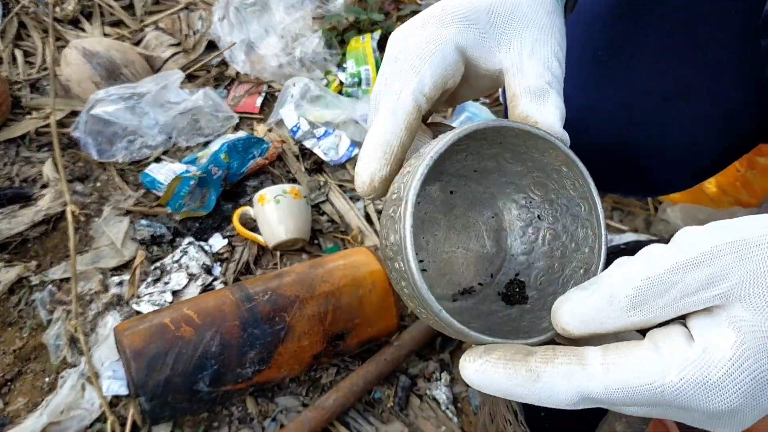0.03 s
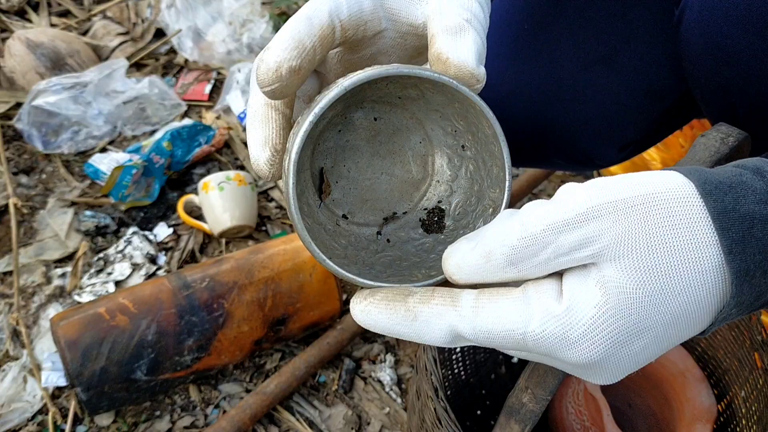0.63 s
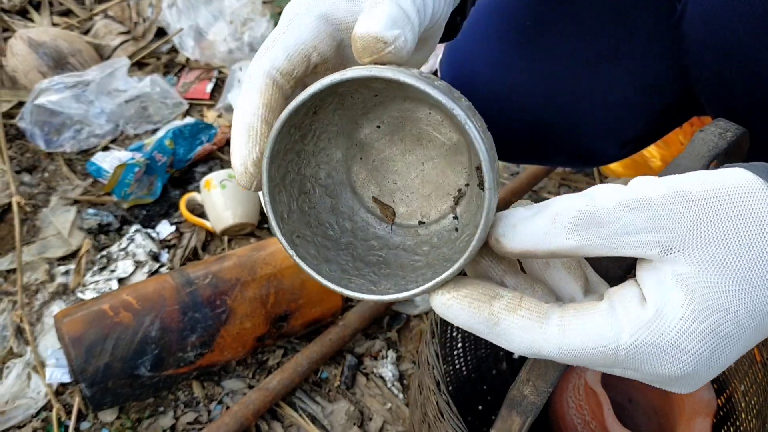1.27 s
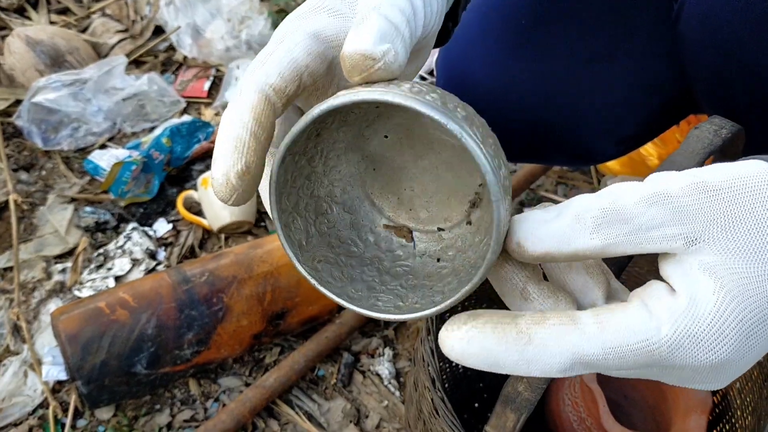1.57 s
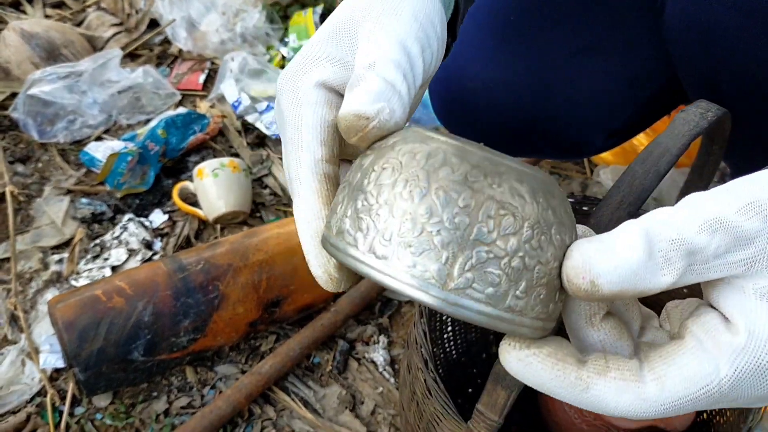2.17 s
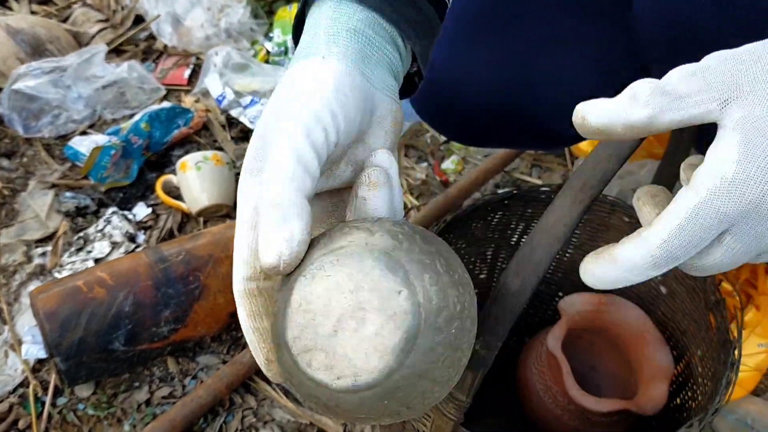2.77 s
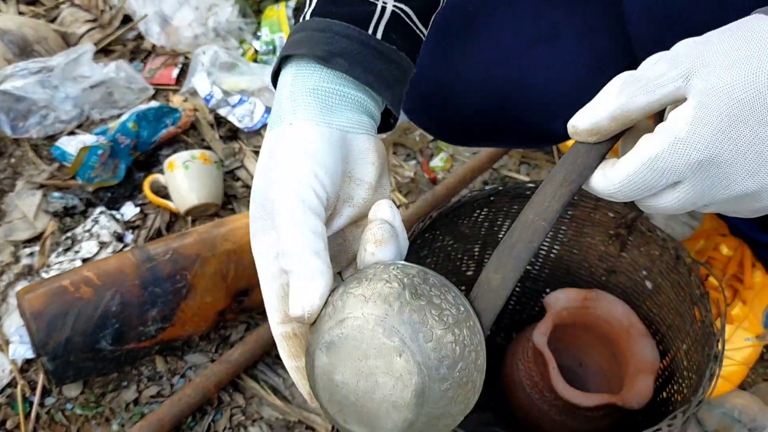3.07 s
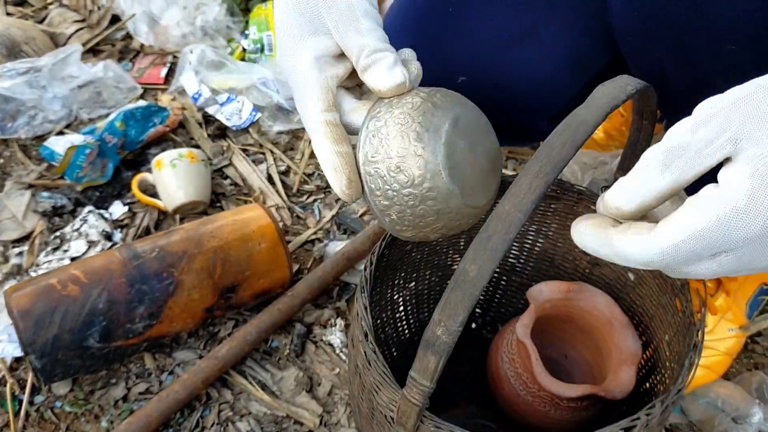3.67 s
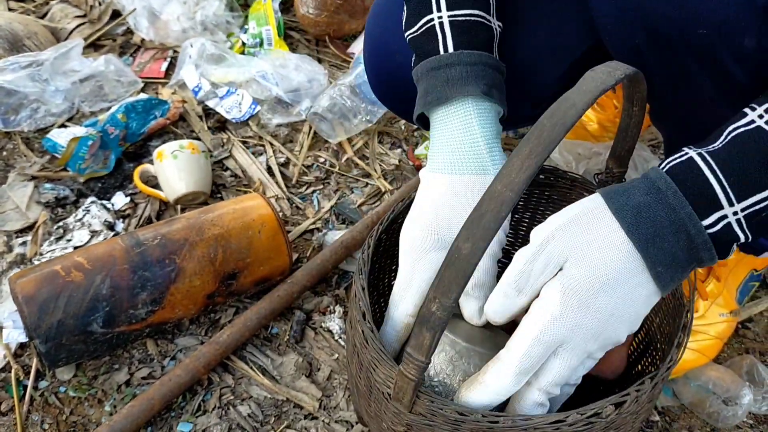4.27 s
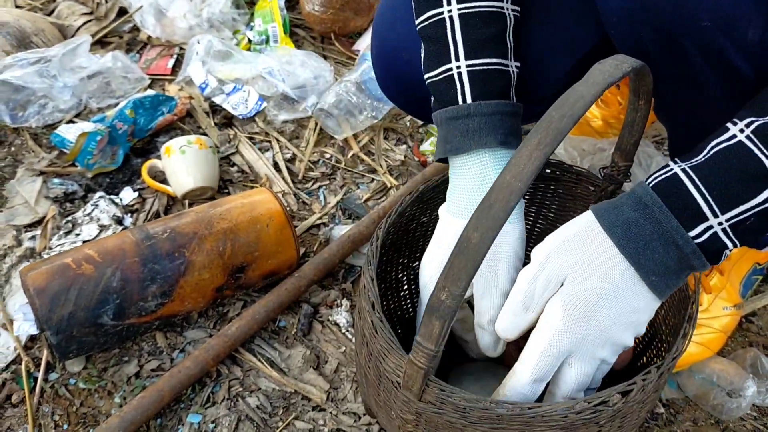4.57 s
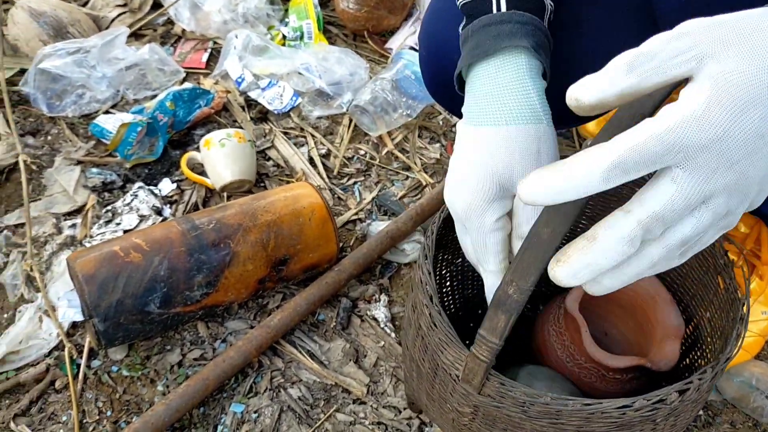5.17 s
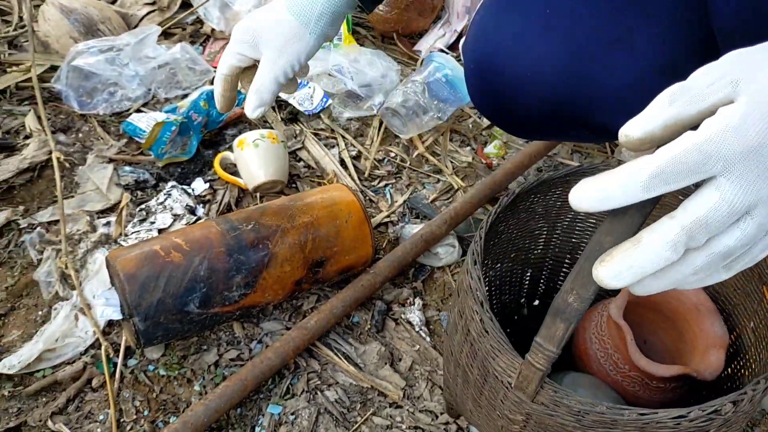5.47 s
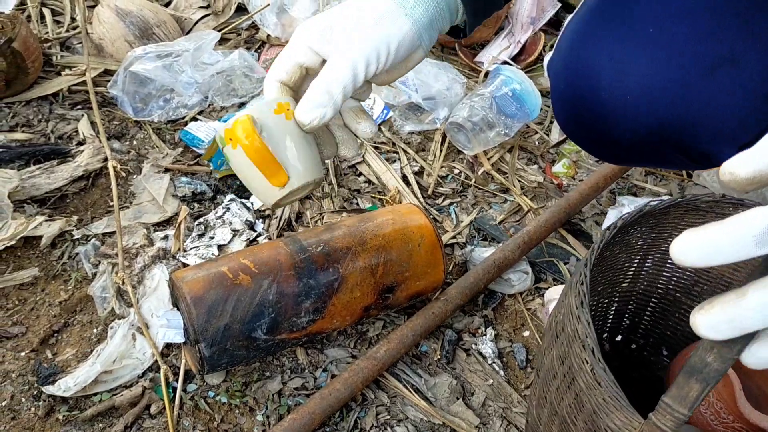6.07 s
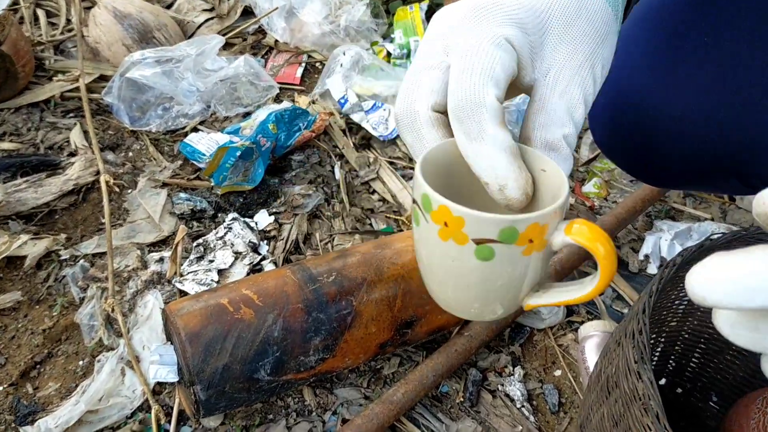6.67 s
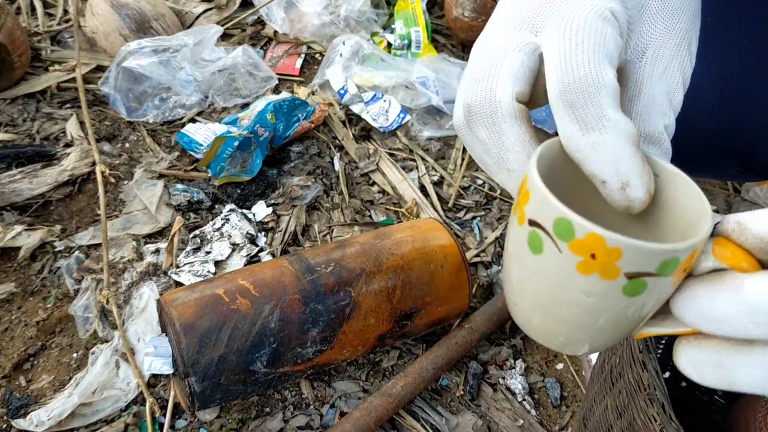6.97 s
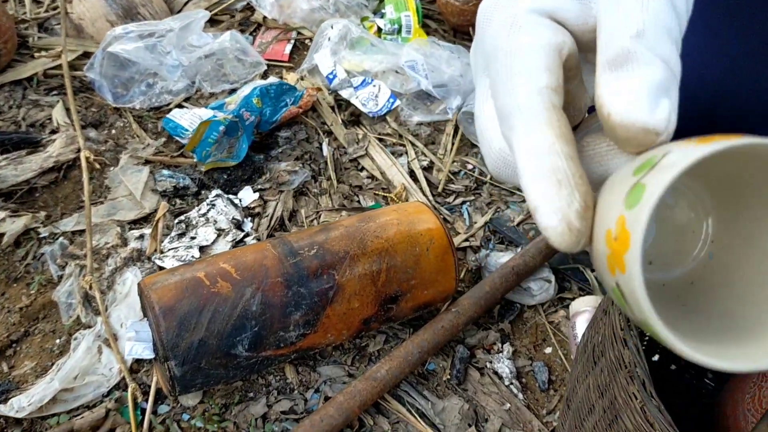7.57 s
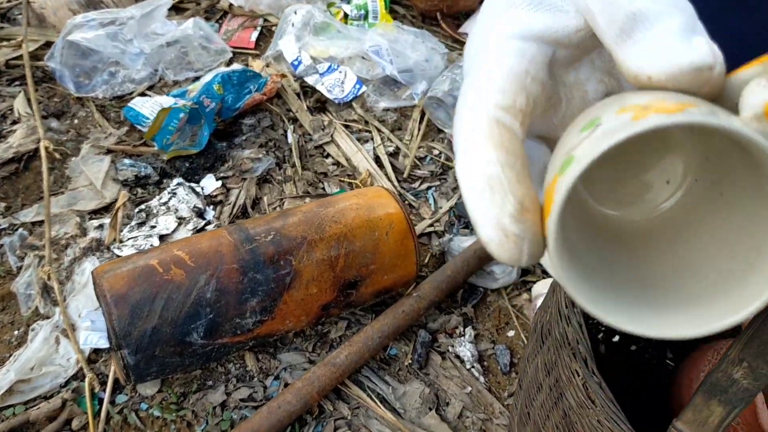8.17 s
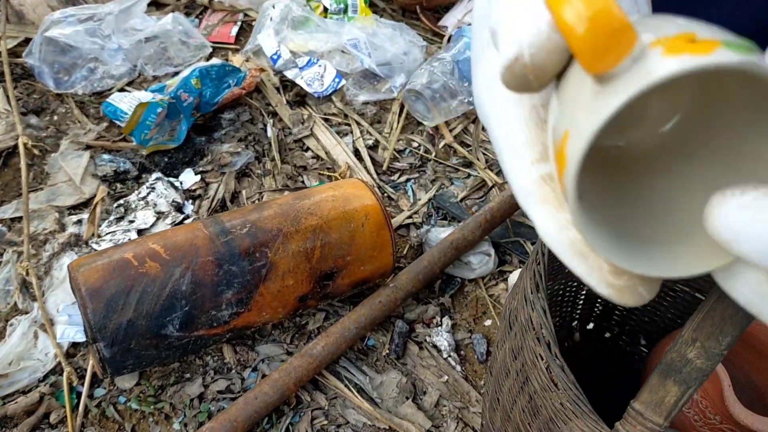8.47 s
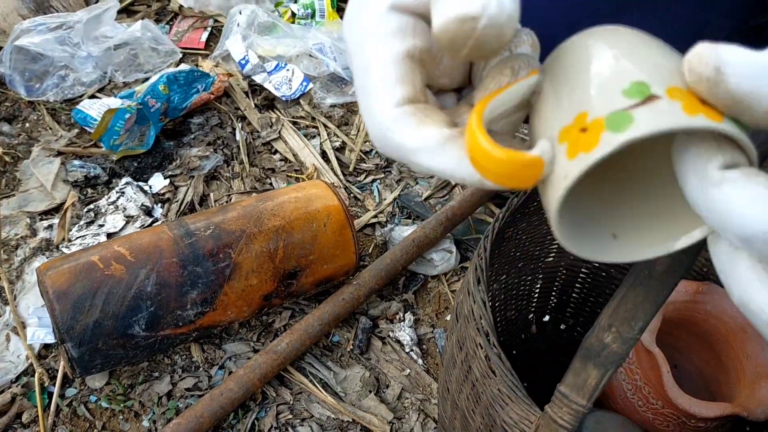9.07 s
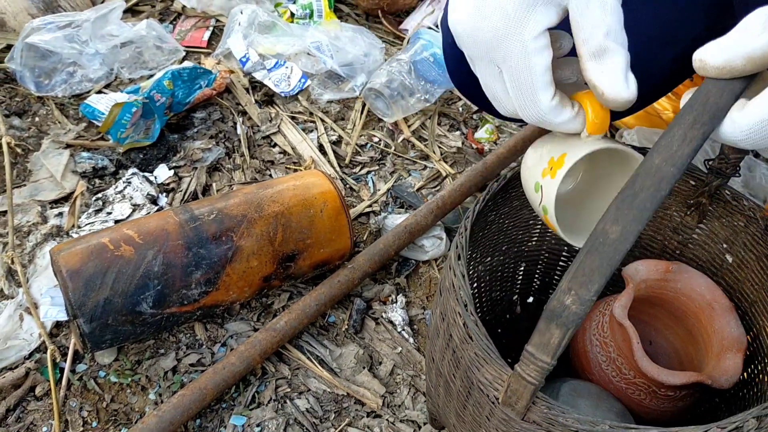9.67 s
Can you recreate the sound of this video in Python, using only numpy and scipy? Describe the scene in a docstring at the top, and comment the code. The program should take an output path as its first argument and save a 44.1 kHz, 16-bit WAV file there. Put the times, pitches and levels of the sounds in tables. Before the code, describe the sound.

A quiet, slightly wavering low hum and rumble continue throughout, outdoors, with light hiss and very faint distant crickets. From the start, cloth gloves rub softly on a small metal bowl close by, with scattered ticks of grit and faint squeaks; a stronger scuff comes near 2.7 seconds. At about 3.0, 3.15 and 3.3 seconds the bowl knocks on a wooden pole: three sharp, short, damped metallic knocks, the third lighter. Soft rubbing continues. At about 4.6 seconds the bowl clinks brightly against a clay pot, thuds on a basket floor and chatters to rest almost at once. These knocks and the landing are by far the loudest sounds, with almost no echo. Near 5.9 seconds dry litter scuffs lightly as a china mug is lifted. Gloves then rub faintly on the mug until the end near 9.8 seconds, with a few small rasping strokes between 7.5 and 8.3 seconds.

```python
"""Gloves rub on a small, gritty metal bowl as they turn it; outdoors, low hum, faint crickets.
Three knocks on a wooden pole shake out dirt: damped modes of bowl and pole, plus a short crack.
Lowered into a basket, the bowl clinks on a clay pot, thuds on the basket floor and chatters to rest.
Then a china mug is lifted from dry litter and turned in the gloves, which rub softly on it.
Rubbing is a run of tiny slips: it hisses and drives the modes of bowl and mug."""
import sys
import numpy as np
from scipy import signal
from scipy.fft import rfft, irfft, next_fast_len
from scipy.io import wavfile
from scipy.ndimage import uniform_filter1d, minimum_filter1d

SR = 44100
rng = np.random.default_rng(int(sys.argv[2]) if len(sys.argv) > 2 else 0)


def to_wav(s):
    """Save 16-bit WAV."""
    ch = np.atleast_2d(s).T  # columns
    pcm = np.round(np.clip(ch, -1, 1) * 32767)  # PCM
    wavfile.write(sys.argv[1], SR, pcm.astype(np.int16))


N = 432621
TIME_S = np.arange(N) / SR
EVENT_S = np.arange(SR // 3) / SR  # time axis of one event
EVENT_MID_S = EVENT_S.mean()

# wandering hum: t/s, f/Hz, level/dB
HUM_CURVE = [(0.0, 203, -68.5), (0.38, 202.5, -71), (0.85, 208.9, -70), (2.15, 207.1, -75.5),
             (2.9, 212.5, -69), (3.4, 208, -71.5), (3.9, 208.2, -71), (4.45, 200.6, -69.5),
             (4.8, 201.7, -68), (5.25, 205.8, -73), (6.1, 210.3, -73), (7.6, 207.1, -66.5),
             (9.05, 210.6, -69.5), (9.6, 209.8, -65.5), (9.81, 203.4, -72)]
# faint steady hum lines: f/Hz, level/dB
HUM_LINES = [(56, -74), (112, -73)]
# rumble envelope: t/s, level/dB
RUMBLE_CURVE = [(0.0, -58), (1.0, -58.5), (1.7, -62), (3.1, -58.5), (4.9, -58.5), (6.25, -63), (7.9, -57.5),
                (8.9, -60.5), (9.81, -58)]
# rumble spectrum: f/Hz, rel. level/dB
RUMBLE_SPECTRUM = [(15, -19.5), (25, -4.5), (36, -2.5), (56, 1.5), (90, -2), (125, -1), (160, -8),
                   (195, -12.5), (235, -18), (330, -28), (600, -45.5), (3000, -90.5)]
# open-air spectrum: f/Hz, rel. level/dB
AIR_SPECTRUM = [(180, -31), (300, 0.5), (378, -7), (417, -1.5), (535, -5.5), (652, -6), (1140, -7.5),
                (1280, -9), (1460, -8), (2650, -10), (5850, -26.5), (8010, -17), (10800, -24.5),
                (15500, -13.5)]
# far crickets: start/s, end/s, f/Hz, chirp period/s, level/dB
FAR_CRICKETS = [(.1, 9.81, 7900, .204, -89), (.1, 9.81, 7660, .204, -93), (.4, 1.5, 8280, .153, -87),
                (.02, .35, 9330, .33, -85)]
# scatter off ground and plants: f/Hz, rel. level/dB
SCATTER_SPECTRUM = [(200, -2.0), (700, -4.0), (1300, -9.0), (3000, -6.5), (15000, -8.5)]

# metal bowl: f/Hz, free t60/s, rim-struck level/dB, wall-struck level/dB
BOWL_MODES = [(983, 0.12, -30.5, -13.5), (1166, .06, -2, -19.5), (2070, .035, -18, -14.5),
              (2325, .06, -16.5, -17), (2570, .06, -18, -14.5), (2990, 0.039, -4, -7.5),
              (3150, 0.037, -12, -26.5), (3440, 0.092, -20.5, -20.5), (3880, 0.098, -16, -19),
              (4190, .085, -5, -5.5), (4630, 0.015, -21.5, -4.5), (5278, .055, -25.5, -10),
              (5500, 0.044, -25.5, -11.5), (5860, 0.09, -16.5, -11), (5970, 0.065, -19, -10),
              (6160, .05, -18.5, -11.5), (7955, .045, -22, -17), (8640, .055, -13.5, -9.5),
              (8800, 0.05, -23, -28), (13000, 0.065, -17.5, -23.5), (13780, 0.063, -13.5, -20.5),
              (14150, 0.051, -13.5, -16), (14630, .06, -13.5, -23.5), (14600, .06, -14.5, -33),
              (15700, .035, -9.5, -18), (15400, 0.05, -25.5, -17.5)]
# wooden pole: f/Hz, t60/s, rel. level/dB
POLE_MODES = [(750, 0.027, -18), (953, 0.017, -2), (1450, 0.015, 2), (1586, 0.015, -9.5),
              (2630, 0.0057, -11)]
# pot ring with dull basket thud: f/Hz, t60/s, rel. level/dB
POT_BASKET_MODES = [(577.3, .02, -23), (736, 0.059, -17), (840, 0.024, -1), (998, .06, -5.5),
                    (1106, 0.066, -10.5), (1458, 0.018, -7), (1650, .04, -11), (1783, .07, -16),
                    (1976, 0.16, -8), (2444, .05, -11.5), (2810, 0.0054, -3), (2805, .05, -6),
                    (3016, 0.2, -26.5), (3800, .12, -18.5), (4830, 0.075, -25.5)]
# held china mug: f/Hz, t60/s, rel. level/dB
MUG_MODES = [(1688, 0.0019, 0), (2552, 0.0096, -4), (3130, 0.012, -8.5), (3830, 0.006, -5),
             (4770, 0.013, -11.5), (5400, 0.013, -15.5), (6600, 0.0048, -8.5), (8000, 0.007, -6),
             (8970, 0.009, -10)]

# glove sliding on the mug: t/s, rel. level/dB
MUG_EFFORT = [(5.1, -79.5), (5.6, -85), (6.35, -84.5), (6.85, -81.5), (8.2, -77.5), (8.6, -88.5),
              (9.15, -83), (9.33, -76), (9.81, -85)]
# cloth on glaze: f/Hz, rel. level/dB
MUG_RUB_SPECTRUM = [(300, -6), (1000, 6.5), (2500, 4.5), (4500, -4.5), (8000, -6), (11000, -4.5),
                    (13000, -1.5), (15200, 4)]
# finger strokes on the mug: mid t/s, half-length/s, level/dB
MUG_STROKES = [(7.504, 0.027, -75.5), (7.95, 0.007, -65.5), (8.017, 0.028, -68.5), (8.119, .026, -67),
               (8.215, 0.018, -68.5), (8.325, 0.012, -71)]
# glove sliding on the bowl: t/s, rel. level/dB
BOWL_EFFORT = [(0.0, -70), (0.45, -82.5), (0.92, -73), (1.6, -81.5), (1.85, -73.5), (2.2, -83.5),
               (2.62, -68), (2.9, -71.5), (3.45, -65), (4.05, -74), (4.28, -68), (5.1, -76)]
# cloth on metal: f/Hz, rel. level/dB
BOWL_RUB_SPECTRUM = [(300, -17.5), (900, 5), (3000, 1.5), (6500, -10), (8800, -2.5), (11000, -6.5),
                     (13000, 1.5), (15200, 3)]
# finger drags on the bowl: mid t/s, half-length/s, f/Hz, level/dB
BOWL_SQUEALS = [(.75, 0.011, 4220, -80), (2.62, 0.1, 3138, -77), (2.66, 0.12, 5894, -77),
                (3.09, 0.055, 4230, -74), (3.66, .1, 4280, -85), (4.25, 0.038, 3050, -75.5)]
# glove, dirt and litter slips, and one soft bump of the bowl on the pole (3.379 s):
# mid t/s, half-length/s, level/dB, f/Hz, width/oct, sparkle level/dB
SCUFFS_AND_BUMP = [(1.797, .028, -72.5, 3600, 0.49, -71), (2.262, .022, -83, 3200, .6, -65),
                   (2.712, 0.047, -60.5, 2980, 1.7, -57), (3.379, 0.0045, -50.5, 1100, 0.35, -80),
                   (3.809, .022, -75, 5000, 1.2, -69), (3.962, .012, -60.5, 7050, 1.5, -67),
                   (4.798, 0.016, -63, 1490, 1.1, -68), (5.247, 0.013, -70, 2400, 0.99, -78),
                   (5.867, 0.0053, -63, 3000, 1.7, -59), (6.495, 0.0092, -74.5, 3200, 1, -88),
                   (9.032, .011, -67, 3800, 1.5, -89), (9.125, 0.015, -67, 4300, 1.9, -93)]
# clearest grit snaps: t/s, level/dB, centre f/Hz, rel. sparkle level/dB
GRIT_SNAPS = [(0.0702, -61.5, 4000, -58), (0.5375, -67, 8800, -65), (0.9226, -59, 8400, -61),
              (2.1475, -61, 9980, -68), (2.2615, -55, 3460, -68), (2.3002, -68, 3170, -66),
              (2.3436, -61, 8780, -61), (2.356, -59, 8580, -56), (3.2835, -55, 4140, -62),
              (3.5315, -60, 4020, -65), (6.596, -68, 3320, -69), (6.7175, -62, 3230, -74)]

# bowl clinks on the pot and thuds on the basket floor (4.6897 s):
# t/s, bowl level/dB, pot and basket level/dB, crack level/dB, crack t60/s, contact cutoff/Hz
LANDING_HITS = [(4.6288, -16, -31.5, -13, .04, 14900), (4.6824, -45, -35.5, -25, .03, 14000),
                (4.6897, -36, -20, -16.5, .022, 3500), (4.6946, -43, -42, -20, .04, 4020),
                (4.7020, -39, -26, -34, .04, 3030), (4.7095, -45, -31, -28, .04, 2520),
                (4.716, -39.5, -28.5, -38, .04, 3000)]
# crack of the landing bowl: f/Hz, rel. level/dB
LANDING_SPECTRUM = [(150, -9), (300, -8.5), (700, 10), (1500, 1.5), (3000, 2.5), (6000, -18.5), (7000, -7),
                    (8600, 0.5), (11000, -11), (15000, 4)]
# bowl on pole: t/s, bowl level/dB, pole level/dB, crack level/dB, contact cutoff/Hz
POLE_HITS = [(2.9851, -10, -9.5, -8.5, 14540), (3.1441, -11.5, -11.5, -13, 14500),
             (3.3097, -17.5, -17, -21.5, 14000)]
# crack of bowl on pole: f/Hz, rel. level/dB
KNOCK_SPECTRUM = [(120, -15), (350, 3), (600, -1), (1250, 7), (1900, -7), (2500, -2), (4000, -1.5),
                  (7000, -8.5), (8600, 0.5), (11000, -10.5), (15000, 6)]

BOWL_END_S, MUG_START_S = BOWL_EFFORT[-1][0], MUG_EFFORT[0][0]


def from_db(db):
    """Decibels to gain."""
    return 10 ** (np.asarray(db) / 20)


def unit_rms(x):
    """Scale to rms 1."""
    return x / np.sqrt(np.mean(x ** 2) + 1e-20)


def curves(rows):
    """Each value column, interpolated to every sample."""
    t_s, *columns = np.transpose(rows)
    return [np.interp(TIME_S, t_s, column) for column in columns]


def add(out, t_s, sound):
    """Mix a sound in from t_s."""
    start = max(0, int(round(t_s * SR)))
    out[start:start + len(sound)] += sound[:N - start]


def coloured(x, spectrum):
    """Shape noise by a spectrum; rms 1."""
    hz, db = np.transpose(spectrum)
    size = next_fast_len(len(x))
    bins_hz = np.maximum(np.fft.rfftfreq(size, 1 / SR), 1)
    gain = from_db(np.interp(np.log(bins_hz), np.log(hz), db))
    return unit_rms(irfft(rfft(x, size) * gain, size)[:len(x)])


def hump(hz, width_oct):
    """Bell-shaped spectrum, -3 dB at width_oct either side."""
    return [(hz * 2 ** (k * width_oct), -3 * k * k) for k in range(-4, 5)]


def swell(half_s):
    """Gaussian envelope, centred on EVENT_MID_S."""
    return np.exp(-.5 * ((EVENT_S - EVENT_MID_S) / half_s) ** 2)


def drift(rate_hz):
    """Random wander between unit-normal knots."""
    knots = rng.standard_normal(N // 50)
    return np.interp(TIME_S * rate_hz, np.arange(len(knots)), knots)


def tone(hz):
    """Sine following a pitch curve; rms 1."""
    return unit_rms(np.sin(2 * np.pi * np.cumsum(hz) / SR))


def grains(size, spread_db):
    """Friction: dense tiny slips of unequal strength."""
    return rng.standard_normal(size) * from_db(spread_db * rng.standard_normal(size))


def resonate(force, hz, t60_s):
    """One driven mode; a unit click rings at height 1."""
    radius, angle = from_db(-60 / (t60_s * SR)), 2 * np.pi * hz / SR
    return signal.lfilter([0, np.sin(angle)], [1, -2 * radius * np.cos(angle), radius ** 2], force)


def ring(modes, scatter_db):
    """Struck modes: decaying sines of alternating sign, levels scattered per blow."""
    hz, t60_s, db = np.transpose(modes)[:, :, None]
    sign = (-1) ** np.arange(len(db))[:, None]
    gain = sign * from_db(db + scatter_db * rng.standard_normal(db.shape))
    return np.sum(gain * np.sin(2 * np.pi * hz * EVENT_S) * from_db(-60 * EVENT_S / t60_s), axis=0)


def crack(spectrum, t60_s):
    """Crowded short-lived modes as a dying noise burst."""
    return coloured(rng.standard_normal(len(EVENT_S)), spectrum) * from_db(-60 * EVENT_S / t60_s)


def contact(x, cutoff_hz):
    """Softer contact, less treble."""
    return signal.sosfilt(signal.butter(1, cutoff_hz, fs=SR, output="sos"), x)


def gripped(t60_s, hand_t60_s=.038):
    """Decay time with the hand's losses added to the metal's."""
    return 1 / (1 / t60_s + 1 / hand_t60_s)


def background(air_db):
    """Wandering hum, faint lines, low rumble and open-air hiss."""
    hum_hz, hum_db = curves(HUM_CURVE)
    hum = from_db(hum_db) * tone(hum_hz)
    for line_hz, db in HUM_LINES:
        wavering_hz = line_hz * (1 + .006 * drift(40))
        hum += from_db(db + 2.5 * drift(1.7)) * tone(wavering_hz)
    rumble_db, = curves(RUMBLE_CURVE)
    rumble = from_db(rumble_db) * coloured(rng.standard_normal(N), RUMBLE_SPECTRUM)
    air = from_db(air_db) * coloured(rng.standard_normal(N), AIR_SPECTRUM)
    return hum + rumble + air


def crickets(jitter_beats, flicker_db):
    """Thin repeated chirps, unsteady in pace, pitch and level."""
    out = np.zeros(N)
    for start_s, end_s, hz, period_s, db in FAR_CRICKETS:
        beat = (TIME_S - start_s) / period_s + jitter_beats * drift(4)
        chirps = np.sin(np.pi * beat) ** 4 * (TIME_S > start_s) * (TIME_S < end_s)
        pitch_hz = hz * (1 + .007 * drift(400))
        out += from_db(db + flicker_db * drift(9.5)) * chirps * tone(pitch_hz)
    return out


def surroundings(x, wet_db):
    """Direct sound plus a brief tail scattered by ground and plants."""
    tail = crack(SCATTER_SPECTRUM, t60_s=.17)
    return x + from_db(wet_db) * signal.fftconvolve(x, tail / np.linalg.norm(tail))[:N]


def mug_rub(hiss_gain_db):
    """Cloth hisses over glaze; firmer strokes rasp into the mug's modes."""
    effort_db, = curves(MUG_EFFORT)
    hiss = coloured(grains(N, spread_db=5), MUG_RUB_SPECTRUM) * from_db(1.5 * drift(20))
    out = from_db(effort_db + hiss_gain_db) * hiss * (TIME_S > MUG_START_S)
    for t_s, half_s, db in MUG_STROKES:
        force = grains(len(EVENT_S), spread_db=6)
        rasp = sum((-1) ** k * from_db(mode_db) * resonate(force, hz, t60_s)
                   for k, (hz, t60_s, mode_db) in enumerate(MUG_MODES))
        add(out, t_s - EVENT_MID_S, from_db(db) * swell(half_s) * unit_rms(rasp))
    return out


def bowl_rub(hiss_gain_db, sing_db, sing_slope, wall_share, slip_delay_s, slip_gain_db):
    """Knit hisses over embossed metal; firm sliding and a slip after each knock make the modes sing."""
    effort_db, = curves(BOWL_EFFORT)
    catching = from_db(2 * drift(25) + 1.8 * drift(250))
    hiss = coloured(grains(N, spread_db=6.5), BOWL_RUB_SPECTRUM) * catching
    hiss *= from_db(effort_db + hiss_gain_db)
    drag = from_db(sing_db + sing_slope * (effort_db - effort_db.max()) + 3.1 * drift(14))
    for t_s, bowl_db, *_ in POLE_HITS:
        slip = from_db(bowl_db + slip_gain_db) * swell(half_s=.025)
        add(drag, t_s + slip_delay_s - EVENT_MID_S, slip)
    force = grains(N, spread_db=2.5)
    singing = np.zeros(N)
    for hz, t60_s, rim_db, wall_db in BOWL_MODES:
        if 2800 < hz < 10000:
            mode_db = rim_db + wall_share * (wall_db - rim_db) + 4.5 * drift(20)
            singing += from_db(mode_db) * np.sqrt(hz) * resonate(force, hz, gripped(t60_s))
    return (hiss + drag * unit_rms(singing)) * (TIME_S < BOWL_END_S)


def squeals(t60_s, flutter_db):
    """Fingertip stick-slip feeds a single bowl mode; the level flutters."""
    out = np.zeros(N)
    for t_s, half_s, hz, db in BOWL_SQUEALS:
        mode = unit_rms(resonate(grains(len(EVENT_S), spread_db=2), hz, t60_s))
        add(out, t_s - EVENT_MID_S, from_db(db) * swell(half_s) * mode)
    return out * from_db(flutter_db * drift(35))


def scuffs_and_bump(sparkle_hz, sparkle_oct):
    """Glove, dirt and litter slips, one soft bump of bowl on pole: grainy swells, sparkle on top."""
    out = np.zeros(N)
    for t_s, half_s, db, hz, width_oct, sparkle_db in SCUFFS_AND_BUMP:
        noise = grains(len(EVENT_S), spread_db=4.5)
        body = from_db(db) * coloured(noise, hump(hz, width_oct))
        sparkle = from_db(sparkle_db) * coloured(noise, hump(sparkle_hz, sparkle_oct))
        add(out, t_s - EVENT_MID_S, swell(half_s) * (body + sparkle))
    return out


def grit(t60_s, sparkle_gain_db, faint_per_s, faint_db, faint_hz):
    """Grains snap and die at once; fainter ones come at random while the bowl is handled."""
    out = np.zeros(N)
    gap_draw, level_draw, pitch_draw = rng.random((40, 3)).T
    times_s = np.cumsum(-np.log(1 - gap_draw)) / faint_per_s
    levels_db = faint_db + 4 * (level_draw - .5)
    centres_hz = faint_hz * 2 ** (1.2 * (pitch_draw - .5))
    faint = [(t_s, db, hz, db) for t_s, db, hz in zip(times_s, levels_db, centres_hz) if t_s < BOWL_END_S]
    for t_s, db, hz, sparkle_db in GRIT_SNAPS + faint:
        add(out, t_s, from_db(db) * crack(hump(hz, width_oct=.45), t60_s))
        add(out, t_s, from_db(sparkle_db + sparkle_gain_db) * crack(hump(18300, width_oct=.33), t60_s))
    return out


def landing():
    """The loosely held bowl clinks on the pot, thuds on the basket floor and chatters to rest."""
    out = np.zeros(N)
    free_modes = [(hz, t60_s, wall_db) for hz, t60_s, _, wall_db in BOWL_MODES]
    for t_s, bowl_db, pot_basket_db, crack_db, crack_t60_s, cutoff_hz in LANDING_HITS:
        bowl = from_db(bowl_db) * ring(free_modes, scatter_db=1.2)
        pot_basket = from_db(pot_basket_db) * ring(POT_BASKET_MODES, scatter_db=1)
        burst = from_db(crack_db) * crack(LANDING_SPECTRUM, crack_t60_s)
        add(out, t_s, contact(bowl + pot_basket + burst, cutoff_hz))
    return out


def knocks():
    """The rim hits the pole; the grip damps every bowl mode."""
    out = np.zeros(N)
    held_modes = [(hz, gripped(t60_s), rim_db) for hz, t60_s, rim_db, _ in BOWL_MODES]
    for t_s, bowl_db, pole_db, crack_db, cutoff_hz in POLE_HITS:
        bowl = from_db(bowl_db) * ring(held_modes, scatter_db=3.53)
        pole = from_db(pole_db) * ring(POLE_MODES, scatter_db=.47)
        burst = from_db(crack_db) * crack(KNOCK_SPECTRUM, t60_s=.02)
        add(out, t_s, contact(bowl + pole + burst, cutoff_hz))
    return out


def scene():
    """Blows, handling and background; mono."""
    blows = surroundings(knocks() + landing(), wet_db=-24)
    handling = grit(t60_s=.011, sparkle_gain_db=13, faint_per_s=3, faint_db=-70, faint_hz=7000)
    handling += scuffs_and_bump(sparkle_hz=14800, sparkle_oct=.44)
    gloves = bowl_rub(hiss_gain_db=1.1, sing_db=-76, sing_slope=1.3, wall_share=.1,
                      slip_delay_s=.055, slip_gain_db=-53.5)
    gloves += squeals(t60_s=.05, flutter_db=3) + mug_rub(hiss_gain_db=7)
    outdoors = crickets(jitter_beats=.16, flicker_db=1.5) + background(air_db=-74.5)
    return (blows + handling + gloves + outdoors)[None]


def gain_control(x, threshold_db, depth_db, hold_s):
    """Loud peaks pull the gain down; it holds, then recovers."""
    wanted_db = -np.clip(20 * np.log10(np.abs(x) + 1e-9) - threshold_db, 0, depth_db)
    window = int(hold_s * SR) | 1
    held_db = minimum_filter1d(wanted_db, window, origin=window // 2)
    ahead = SR // 500  # 2 ms look-ahead and smoothing
    return x * from_db(uniform_filter1d(np.roll(held_db, -ahead), ahead))


def record(dry):
    """Gain control, then a steep low-pass at 15.7 kHz."""
    levelled = gain_control(dry, threshold_db=-17, depth_db=8, hold_s=.08)
    return signal.sosfilt(signal.ellip(10, .2, 70, 15700, fs=SR, output="sos"), levelled)


dry = scene()
out = record(dry)
to_wav(out)
```